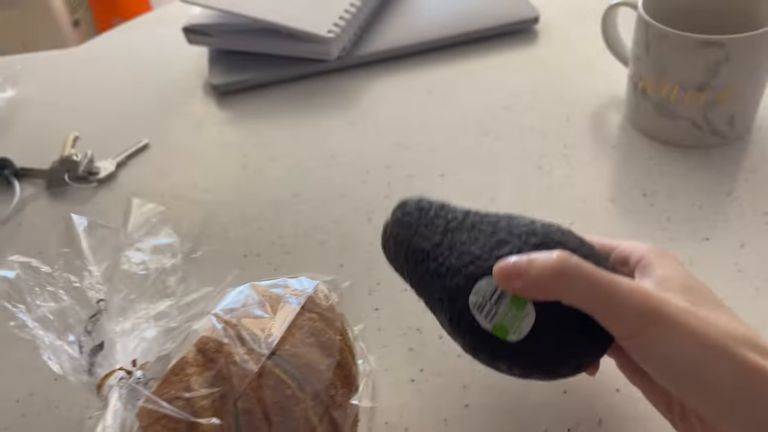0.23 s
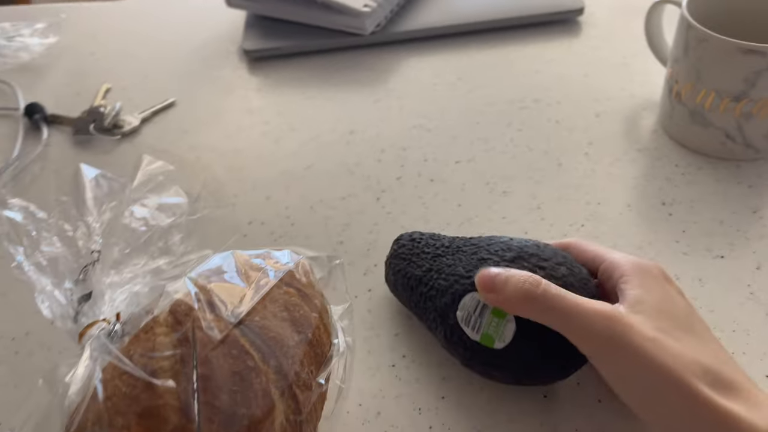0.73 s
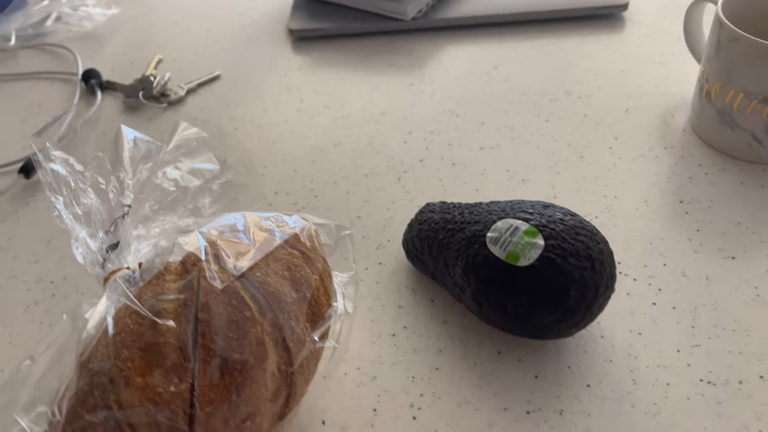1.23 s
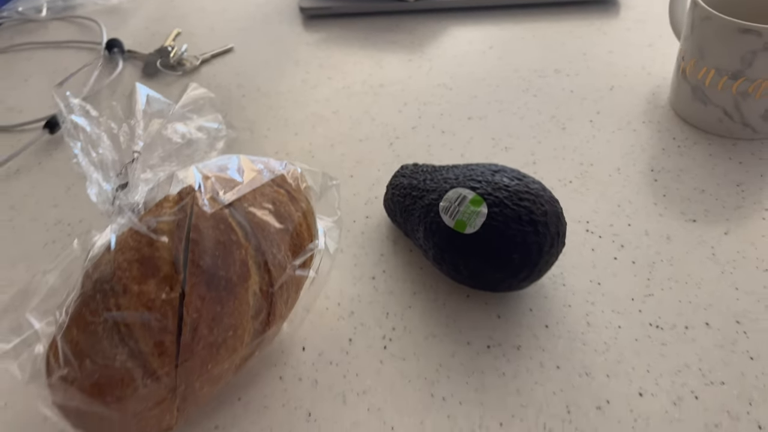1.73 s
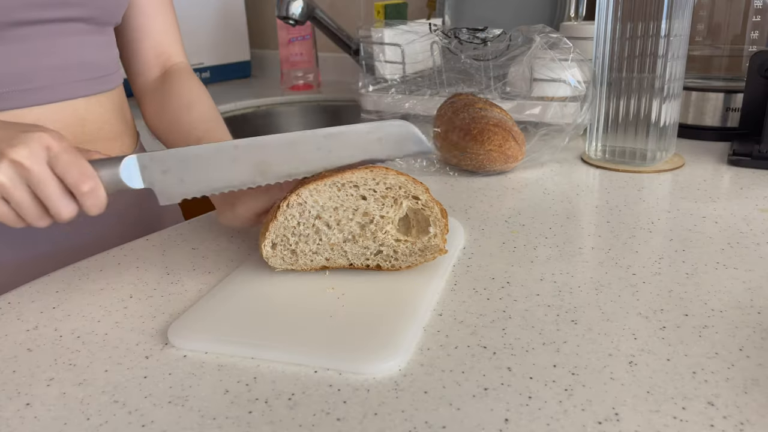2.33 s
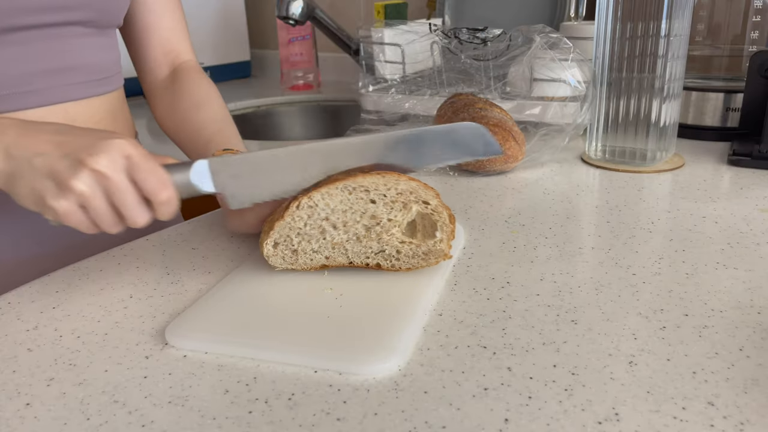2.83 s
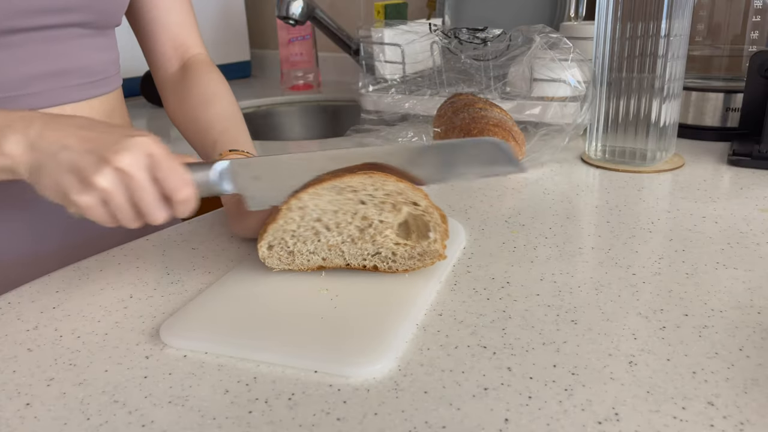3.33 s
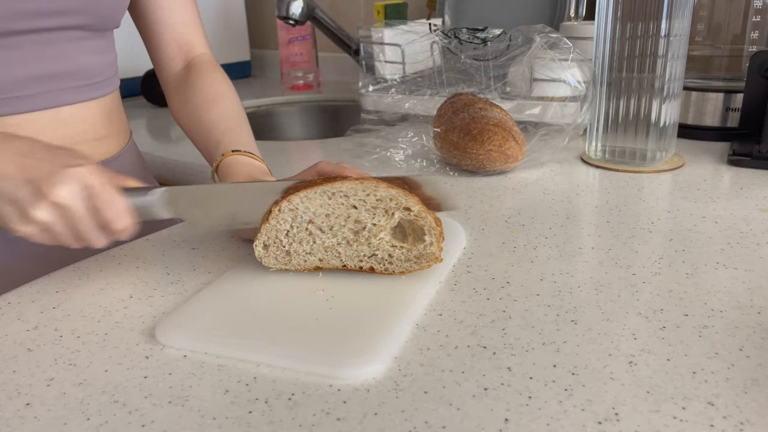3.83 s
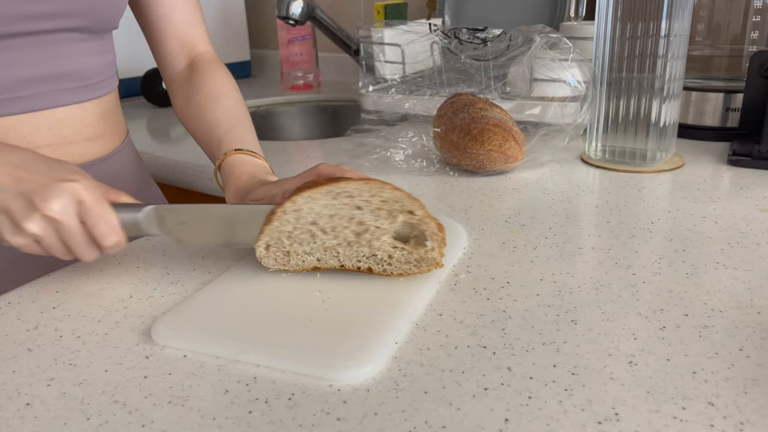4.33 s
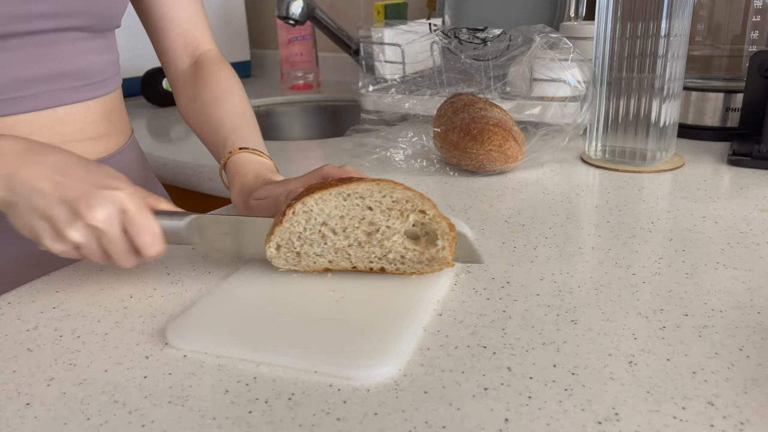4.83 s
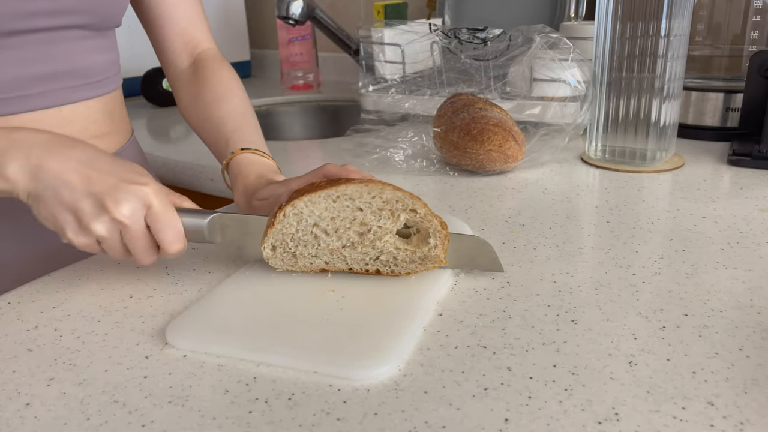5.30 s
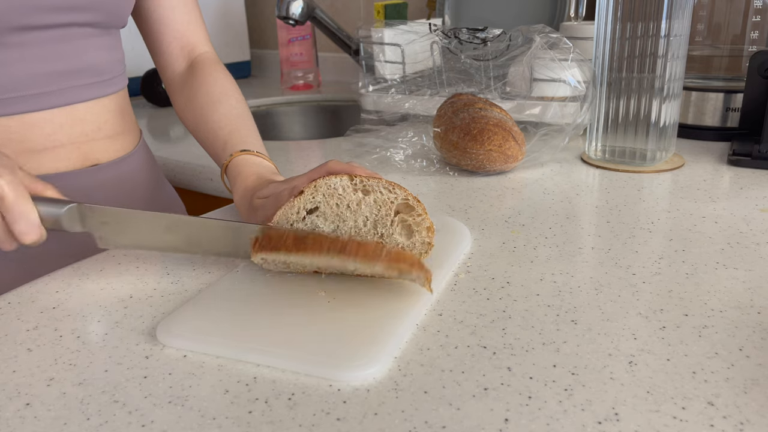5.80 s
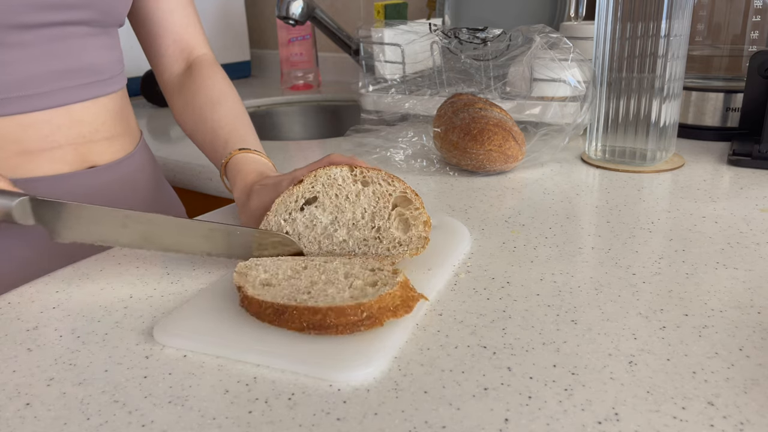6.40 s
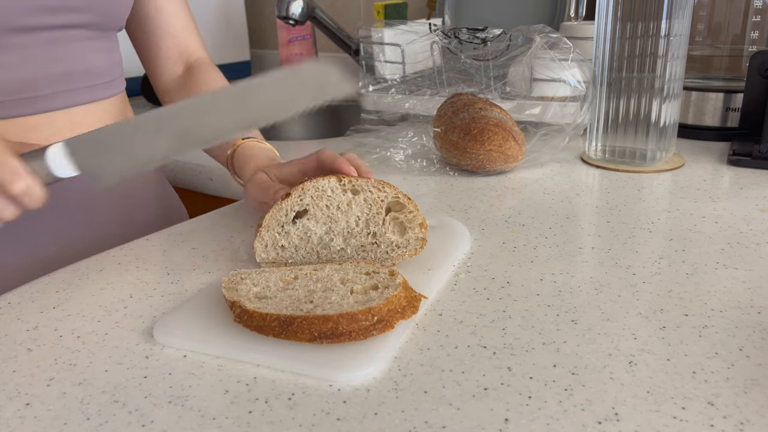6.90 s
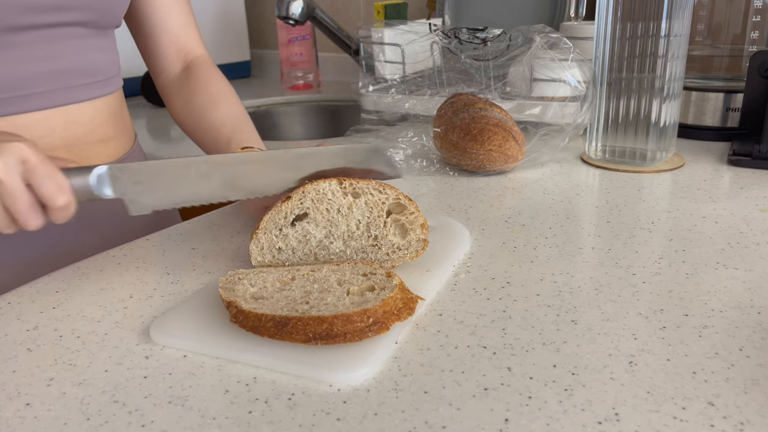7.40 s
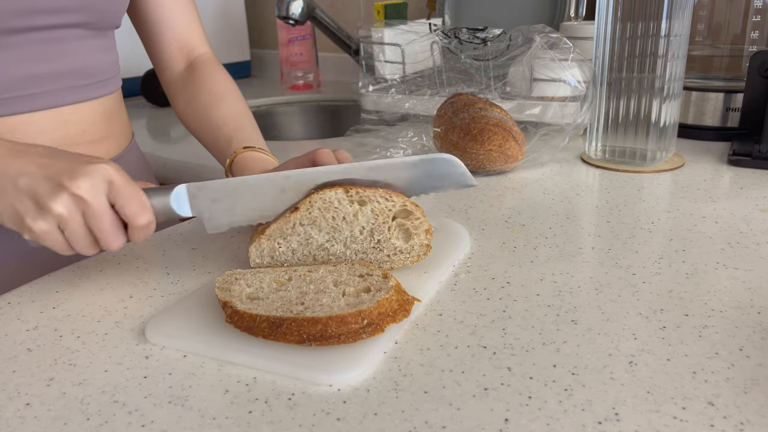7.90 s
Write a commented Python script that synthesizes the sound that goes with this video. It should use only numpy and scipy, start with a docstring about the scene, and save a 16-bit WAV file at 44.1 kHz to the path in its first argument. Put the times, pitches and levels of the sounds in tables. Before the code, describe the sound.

Sleeves rustle and an avocado lands softly on a counter, then a serrated knife saws crisply through a crusty loaf and starts another slice.

```python
"""A fruit is set on a kitchen counter and sleeves rustle: dull modal knocks, short ticks and the hiss of fibres.
After a short silence a serrated knife saws through a crusty loaf on a plastic board, scrapes the board and
starts a new slice: grains of tearing crumb, clumps of breaking loaf, board resonances and ringing steel modes.
Ventilation, as banded noise, and a low hum of uneven level lie beneath; two ports hear it all in stereo."""
import sys
import numpy as np
from scipy import signal
from scipy.fft import rfft, irfft, next_fast_len
from scipy.io import wavfile
from scipy.ndimage import uniform_filter1d

SR = 44100
rng = np.random.default_rng(int(sys.argv[2]) if len(sys.argv) > 2 else 0)


def put_to_file(sound):
    """Save the sound as 16-bit audio at rate SR, in the file named by the first command-line argument."""
    columns = np.atleast_2d(sound).T  # one column per channel
    safe = np.clip(columns, -1, 1)
    whole_steps = np.round(safe * 32767)
    wavfile.write(sys.argv[1], SR, whole_steps.astype(np.int16))


N = 359415
FFT_LENGTH = next_fast_len(N)
HZ = np.arange(FFT_LENGTH // 2 + 1) * SR / FFT_LENGTH  # frequency of every bin
TIME_S = np.arange(N) / SR
SILENCE_S = 2.2225, 2.2685  # start and end
BURST_SAMPLES = 600  # length of a tick's noise
BOARD_LOW_HZ = 93  # the small board radiates little below this


def knife():
    """Stick-slip friction: teeth tear the crumb in grains, and the same motion drives loaf, board and blade."""
    # saw strokes: start t/s, length/s, share of length before the fastest point (0-1), hiss gain/dB,
    # gains re hiss/dB of loaf body, loaf rasp and board
    strokes = [(2.289, 0.25, 0.6, -70.5, 9, 10.5, 15), (2.558, 0.2, 0.39, -66.5, -12, 0, -2),
               (2.702, 0.24, 0.49, -57.5, 4.5, 9.5, 9.5), (2.935, 0.24, 0.25, -62.5, 2, 4, 7),
               (3.103, 0.25, 0.35, -54, 7.5, 5.5, 7.5), (3.311, 0.23, 0.37, -55.5, 3, 6, 7),
               (3.492, 0.25, 0.37, -52.5, 5, 7.5, 4.5), (3.708, 0.22, 0.46, -54.5, 3.5, 10.5, 6.5),
               (3.918, 0.23, 0.3, -55.5, 6, 7.5, 8.5), (4.118, 0.21, 0.47, -58, 9, 5.5, 9),
               (4.315, 0.2, 0.42, -55.5, 4.5, 4.5, 6), (4.46, 0.26, 0.61, -58.5, 5, 5.5, 6),
               (4.691, 0.21, 0.55, -57, 1.5, 4, 5.5), (4.829, 0.34, 0.59, -62, 0, 1.5, 6.5),
               (5.12, 0.19, 0.52, -62.5, 14.5, 7.5, 18), (5.282, 0.49, 0.42, -67.5, 9.5, 6, 19.5),
               (5.503, 0.33, 0.62, -73, 11.5, 7.5, 17), (5.942, 0.18, 0.22, -78.5, -2.5, 6, -3),
               (7.213, 0.18, 0.31, -70.5, 3, -4, -1), (7.367, 0.25, 0.3, -66, 10.5, 5.5, 8),
               (7.52, 0.2, 0.64, -78.5, -2, 6, 18.5), (7.728, 0.22, 0.42, -58.5, 9, 8, 6.5),
               (7.918, 0.21, 0.37, -60, -2, 3, 4.5), (8.077, 0.2, 0.48, -56, 4, 7, 11)]
    # blade brushing or dragging over board and crust: start t/s, contact/s, hiss gain/dB,
    # gains re hiss/dB of loaf body, loaf rasp and board
    scrapes = [(6.108, 0.018, -71.5, 9.9, 9.4, 1), (6.414, 0.027, -58.5, 3.8, 9.3, 5.5),
               (7.058, .012, -78.5, 6, 2, 8)]
    # colour of tearing crumb: f/Hz, relative level/dB
    crumb_colour = [(1800, -14), (2800, -3), (4500, -4), (6300, -6), (7500, -1.5), (9000, 0.5),
                    (10500, -0.5), (11500, 3.5), (12100, -39), (12800, -24)]
    # board resonances: f/Hz, width/Hz (t60 is 2.9 / width), drive gain/dB
    board_modes = [(137, 58, 1.5), (156, 69, 3.5), (210.5, 48, -2.5), (273, 27, -3), (358, 63, -2)]
    moves = strokes + scrapes
    shapes = [sweep(*row[:3]) for row in strokes] + [scrape(*row[:2]) for row in scrapes]
    gains = movement_gains(shapes, [row[-4] for row in moves], [row[-3:] for row in moves])
    hiss_gain, body_gain, rasp_gain, board_gain = gains

    catch = undb(1.27 * walk(90))  # the teeth catch and let go unevenly
    tearing = grains(12000, spread_db=1.13)
    crumb = undb(2.5) * unit(shape(tearing, undb(on_hz(crumb_colour))))

    shove = grains(900, spread_db=0.73)
    board = unit(sum(undb(db) * ring(shove, hz, 2.9 / width) for hz, width, db in board_modes))
    cushion = 1 / (1 + (HZ / 460) ** 6)  # the soft loaf cushions the push
    radiation = 1 / (1 + (BOARD_LOW_HZ / (HZ + 1)) ** 4)
    board = unit(shape(board, cushion * radiation))

    impulse = 1. * (np.arange(4000) == 0)
    held_response = blade(impulse, 0.13)  # bread leaves this share of the ring time
    held = unit(signal.oaconvolve(grains(5000, spread_db=1.3), held_response)[:N])
    hiss = crumb + undb(-8) * held
    return catch * (hiss_gain * hiss + crunch(body_gain, rasp_gain) + board_gain * board)


def crunch(body_gain, rasp_gain):
    """Brittle fracture: the loaf breaks in clumps that come and go separately in body, middle and upper rasp."""
    # colour of breaking loaf: f/Hz, relative level/dB
    loaf_colour = [(250, -22.5), (400, 1.5), (620, 6.5), (900, -4), (1340, -1.5), (1600, -3.5), (1800, -5),
                   (2300, -7.5), (2860, -11), (3600, -24.5)]
    # extra gain of the upper rasp, which grows as the blade sinks into the crumb: t/s, gain/dB
    rasp_course = [(2.7, -8.5), (3.5, -1), (4.7, 7.5), (5.3, 6), (7.3, -7.5)]
    body_top_hz, rasp_hz = 836, 2050  # body below, upper rasp above
    loaf = unit(shape(grains(4000, spread_db=2.0), undb(on_hz(loaf_colour))))
    body = shape(loaf, 1 / (1 + (HZ / body_top_hz) ** 6))
    upper = shape(loaf, 1 - 1 / (1 + (HZ / rasp_hz) ** 6))
    middle = loaf - body - upper
    upper_gain = rasp_gain * undb(over_time(rasp_course))
    parts = body * body_gain, middle * rasp_gain, upper * upper_gain
    return sum(part * undb(2.0 * walk(30)) for part in parts)


def blade(force, share):
    """Modal superposition: steel rings in bending modes; contact leaves only a share of each ring time."""
    # bending modes of the blade: f/Hz, drive gain/dB, undamped t60/s
    modes = [(620, -7, .14), (1165, -1.5, .18), (1925, -7, .1), (2270, -2, .08), (3046, -19, .4),
             (3235, -5, .36), (3924, -14, .44), (4059, -6, .25), (4931, -3, .22), (5864, -15, .22),
             (6010, -10, .12), (6990, -9, .14), (7499, -11, .12), (8513, -13, .23), (8802, 1, .27),
             (9385, -10, .16), (10430, -4, .09), (11069, -11, .5), (11770, -5, .13), (12284, -13, .42)]
    return sum(undb(db) * ring(force, hz, share * t60) for hz, db, t60 in modes)


def blade_ticks():
    """Impulsive excitation: each click is a brief noise near its centre and jolts the nearby blade modes most."""
    # crust cracking around the blade: t/s, click peak/dB, centre f/Hz
    cracks = [(2.39, -59, 3000), (2.454, -50, 4500), (2.795, -42, 2500), (3.133, -60, 2900),
              (3.141, -59, 3000), (3.522, -39, 7040), (3.752, -43.5, 6000), (3.777, -51, 6000),
              (3.836, -32, 1700), (3.936, -55, 7000), (4.026, -34.5, 1720), (4.352, -39, 7000),
              (5.049, -38, 2600), (5.21, -44, 1800), (5.588, -45, 7000), (7.131, -60, 1470),
              (7.404, -47, 1170), (7.479, -44, 9000), (8.134, -53, 3000)]
    # taps and jolts of the blade, some damped, some ringing freely: t/s, click peak/dB, centre f/Hz,
    # blade drive re click peak/dB, share of ring time (0-1)
    taps = [(6.115, -47, 9850, -14, .1), (6.133, -51, 10500, -13, .2), (6.562, -62, 9000, -14, .4),
            (6.97, -65, 6000, -17, .16), (7.07, -60, 8500, -14, .25), (7.265, -51, 8500, -18, .2),
            (6.423, -46, 9500, -10, .98), (6.428, -39, 1500, 1, .8), (6.434, -46, 5400, -6, .9),
            (6.44, -48, 8800, -1, 1), (6.445, -47, 11400, -5, .9), (6.457, -43, 3500, 1, 1),
            (7.277, -63, 4700, 4, .5)]
    tail = 30000  # longest ring, samples
    out, t = np.zeros(N + tail), np.arange(tail) / SR
    rows = [(*row, -27, 0.39) for row in cracks] + list(taps)  # cracks: blade drive dB, share
    noises = rng.standard_normal((len(rows), BURST_SAMPLES))
    for (start, db, hz, ring_db, share), noise in zip(rows, noises):
        burst = noise * np.exp(-t[:BURST_SAMPLES] / 0.0015)
        click = 0.11 * burst + 0.76 * ring(burst, hz, 3.3 / hz)
        # two resonators in series gather the jolt around the click's centre
        jolt = ring(ring(1. * (t == 0), hz, 2.6 / hz), hz, 2.6 / hz)
        jolt = jolt[:int(tail * min(share, 1))] * (hz / 11000) ** 2
        i = int(start * SR)
        out[i:i + BURST_SAMPLES] += undb(db) * click / np.abs(click).max()
        out[i:i + len(jolt)] += undb(db + ring_db) * blade(jolt, share)
    return out[:N]


def knocks():
    """Modal impact: a soft blow excites a low mode and a weaker, longer one at 1.6 times its frequency."""
    # dull knocks through counter and board: t/s, drive gain/dB, lower mode f/Hz, its t60/s
    blows = [(.475, -24.5, 293, 0.038), (5.046, -34.5, 137, 0.23), (5.056, -33, 313, 0.035),
             (5.201, -31.5, 171, 0.12), (5.22, -24, 132.6, 0.12), (5.26, -26.5, 137.3, 0.082),
             (5.41, -38, 144, 0.18), (5.459, -32.5, 273, 0.1), (3.268, -44, 620, .05),
             (5.52, -41, 298, 0.077), (6.421, -40, 334, 0.28), (7.479, -45, 131, 0.12)]
    out, force = np.zeros(N), np.zeros(12000)
    force[:120] = np.hanning(120) / 50
    for start, db, hz, t60 in blows:
        i = int(start * SR)
        low, high = ring(force, hz, t60), ring(force, 1.6 * hz, 2.1 * t60)
        out[i:i + 12000] += undb(db) * (0.62 * low + 0.25 * high)
    return signal.sosfilt(signal.butter(2, BOARD_LOW_HZ, "high", fs=SR, output="sos"), out)


def counter_ticks():
    """Damped resonance: a very short contact rings one narrow band for a few cycles."""
    # small ticks at the counter: t/s, peak level/dB, centre f/Hz
    contacts = [(.310, -38, 8000), (.476, -47, 3600), (.589, -60, 4300), (.975, -55, 9500),
                (2.133, -32, 960), (2.133, -58, 5500), (1.8152, -30, 1680), (1.8152, -29, 2850),
                (1.8152, -33, 3700), (1.8152, -37, 7000), (1.8152, -36, 9500)]
    out, t = np.zeros(N), np.arange(BURST_SAMPLES) / SR
    noises = rng.standard_normal((len(contacts), BURST_SAMPLES))
    for (start, db, hz), noise in zip(contacts, noises):
        contact = noise * np.exp(-t / 0.0005)
        tick = ring(ring(contact, hz, 6.5 / hz), hz, 3.0 / hz)
        out[int(start * SR):][:BURST_SAMPLES] += undb(db) * tick / np.abs(tick).max()
    return out


def rustle():
    """Sliding friction: slipping fibres make many tiny breaks, heard as fine hiss with a duller rub beneath."""
    # sleeves and fingers sliding: start t/s, length/s, share of length before the fastest point (0-1),
    # hiss gain/dB, dull gain re hiss/dB
    slides = [(-.03, 0.22, 0.26, -39.5, -14), (0.059, 0.24, 0.5, -43, -23), (0.228, 0.31, 0.21, -59, -9),
              (.88, .4, 0.4, -75, -14), (0.979, 0.43, 0.48, -53.5, -18), (1.342, 0.21, 0.54, -68.5, -6),
              (1.565, 0.38, 0.53, -63.5, -3.5), (1.779, 0.25, 0.27, -73, 14.5)]
    # colour of cloth: f/Hz, relative level/dB
    cloth_colour = [(2500, -13), (4000, -8.5), (6000, -6), (7500, -4.5), (9000, 1.5), (10500, -1),
                    (11500, 1), (12100, -23), (12800, -6)]
    shapes = [sweep(*row[:3]) for row in slides]
    hiss_gain, dull_gain = movement_gains(shapes, [row[3] for row in slides], [row[4:] for row in slides])
    fibres = grains(15000, spread_db=0.8) * undb(walk(40))
    hiss = undb(6.0) * unit(shape(fibres, undb(on_hz(cloth_colour))))
    rub_colour = [(700, -17.5), (1400, 3.5), (3500, -1.0), (5000, -21)]  # f/Hz, relative level/dB
    rub = unit(shape(fibres, undb(on_hz(rub_colour))))
    before = TIME_S < SILENCE_S[0]
    return before * (hiss_gain * hiss + dull_gain * rub)


def drone():
    """Modulated tone: a low hum, one sine whose pitch wavers and whose level rises and falls strongly."""
    # uneven level of the low hum: t/s, mean rms level/dB
    hum_level = [(0.0, -49), (0.45, -47), (0.5, -37), (0.91, -56), (1.18, -45), (1.23, -62), (1.38, -43),
                 (1.52, -70), (1.59, -46), (1.7, -78), (1.77, -50), (2.59, -56.5), (3.81, -53.5),
                 (3.86, -44.5), (4.06, -64), (4.29, -46), (4.61, -60), (5.15, -61), (5.29, -66),
                 (5.49, -57), (6.06, -61.5), (6.11, -70), (6.2, -50), (6.42, -61), (6.51, -45),
                 (6.56, -58.5), (7.69, -51.5), (7.81, -69), (8.01, -47.5), (8.15, -53)]
    hz = 61.35 + 4.92 * walk(7)
    level_db = over_time(hum_level) + 2.5 * walk(9)
    return np.sqrt(2) * undb(level_db) * np.sin(2 * np.pi * np.cumsum(hz) / SR)


def air():
    """Broadband flow noise: ventilation as overlapping bands, an octave apart, whose levels waver a little."""
    # ventilation heard at the counter: f/Hz, mean level in 1 Hz/dB
    near_spectrum = [(28, -94), (45, -66.5), (90, -66), (130, -68), (200, -72), (300, -77), (450, -82),
                     (620, -83.5), (800, -88.5), (1400, -89), (2000, -93.5), (2600, -100), (3500, -110),
                     (4800, -119), (8000, -120), (10500, -114), (11800, -116), (12900, -135)]
    # ventilation heard further off, at the board: f/Hz, mean level in 1 Hz/dB
    far_spectrum = [(28, -105), (45, -71.5), (90, -77.5), (130, -78.5), (200, -84.5), (300, -87.5),
                    (450, -88.5), (640, -92), (780, -102), (1200, -99), (1800, -101), (2500, -108),
                    (3400, -118), (4500, -127), (8000, -128), (10500, -122), (11800, -124), (12900, -142)]
    out, before = 0, np.arange(N) < SILENCE_S[0] * SR
    for spectrum, here in (near_spectrum, before), (far_spectrum, ~before):
        density = undb(on_hz(spectrum)) * np.sqrt(SR / 2)
        for centre in 30 * 2. ** np.arange(9):
            upper_edge = 1 if centre < 7000 else 0  # the top band stays open above its centre
            octaves_off = np.clip(np.log2((HZ + 1) / centre), -1, upper_edge)
            weight = np.abs(np.cos(octaves_off * np.pi / 2))  # neighbours sum to constant power
            band = shape(rng.standard_normal(N), weight * density)
            out = out + here * band * undb(1.2 * walk(2.966))
    return out


def sweep(start, length, early):
    """Kinematics of a stroke: loudness, 0-1, follows a power of speed, eased near full speed."""
    speed_power, easing = 3.81, .5
    done = np.clip((TIME_S - start) / length, 0, 1)
    warp = np.log(.5) / np.log(np.clip(early, .1, .9))  # puts the fastest point at `early`
    loud = np.abs(np.sin(np.pi * done ** warp)) ** speed_power
    return loud * (1 + easing) / (1 + easing * loud)


def scrape(start, contact):
    """Contact envelope: quick attack, a hold, then exponential decay; loudness 0-1."""
    attack_s, t60_s = 0.0064, .26
    t = TIME_S - start
    fade_db = -60 * np.clip(t - attack_s - contact, 0, None) / t60_s
    return np.clip(t / attack_s, 0, 1) ** 2 * undb(fade_db)


def linger(gain):
    """Reverberant energy decay: the kitchen carries each movement on as a fading tail."""
    tail_db, t60_s = -12.5, 0.7
    r = np.exp(-2 * np.log(1000) / (t60_s * SR))  # decay of power per sample
    tail_power = signal.lfilter([1 - r], [1, -r], gain ** 2)
    return np.sqrt(gain ** 2 + undb(tail_db) ** 2 * tail_power)


def movement_gains(shapes, hiss_db, parts_re_hiss_db):
    """Superposition: sums the movements into one gain for the hiss and one for each part moving with it."""
    hiss_db = np.array(hiss_db)[:, None]
    all_db = np.hstack([hiss_db, hiss_db + np.array(parts_re_hiss_db)])
    return [linger(gain) for gain in undb(all_db).T @ np.array(shapes)]


def grains(rate, spread_db):
    """Shot noise: dense tiny breaks of random sign, rate per second, a few much larger than the rest."""
    hit = rng.random(N) < rate / SR
    return unit(hit * rng.standard_normal(N) * undb(spread_db * rng.exponential(1, N)))


def walk(rate):
    """Slow random modulation: levels held 1 / rate s and slewed; rms 1."""
    hold = int(SR / rate)
    levels = rng.standard_normal(N // 100)
    return unit(uniform_filter1d(levels[np.arange(N) // hold], hold))


def ring(x, hz, t60):
    """Damped oscillator: one decaying mode; a unit blow starts it at amplitude 1."""
    r, w = np.exp(-np.log(1000) / (t60 * SR)), 2 * np.pi * hz / SR
    return signal.lfilter([np.sin(w)], [1, -2 * r * np.cos(w), r * r], x)


def shape(x, gain):
    """Linear filtering: weights every frequency bin."""
    return irfft(rfft(x, FFT_LENGTH) * gain, FFT_LENGTH)[..., :N]


def on_hz(table):
    """Logarithmic frequency scale: reads (f/Hz, value) at every bin, straight between points."""
    hz, value = np.transpose(table)
    return np.interp(np.log(HZ + 1), np.log(hz), value)


def over_time(table):
    """Linear interpolation: reads (t/s, value) at every sample."""
    t, value = np.transpose(table)
    return np.interp(TIME_S, t, value)


def undb(db):
    """Logarithmic level: decibels to amplitude gain."""
    return 10 ** (np.asarray(db) / 20)


def unit(x):
    """Mean power: scales to rms 1."""
    return x / np.sqrt(np.mean(x ** 2))


def scene():
    """Mid-side stereo: the ports differ by unrelated noise and, for blows, by their first echoes."""
    # side spectrum: f/Hz, side gain/dB
    side_colour = [(60, -20), (130, -15.5), (270, -11.5), (600, -2), (1300, -4.5), (2700, -7), (6000, -5),
                   (8000, -6.5), (8700, -16), (9400, -3.5), (10200, -33.5), (11000, -10), (13000, -18.5)]
    # balance of the ports: f/Hz, left minus right gain/dB
    balance = [(60, 0), (150, -0.8), (300, 0), (600, 0), (2000, 2), (5000, 4), (7500, 2.5), (8700, 0)]
    blows = counter_ticks() + blade_ticks() + knocks()
    early = np.arange(900)  # samples of first echoes
    echoes = rng.standard_normal(len(early)) * np.exp(-early / (0.007 * SR))
    echoes = unit(echoes) / np.sqrt(len(early))  # total energy 1
    mid = rustle() + knife() + air() + drone() + blows
    side = rustle() + knife() + air() + signal.oaconvolve(blows, echoes)[:N]
    side = shape(side, undb(on_hz(side_colour)))
    lean = undb(on_hz(balance) / 2)
    return shape(np.array([mid + side, mid - side]), np.array([lean, 1 / lean]))


def record(dry):
    """Phase difference: the ports turn against each other; the sound drops out once; the top is cut."""
    # phase by which the left port leads: f/Hz, phase/rad
    phase_lead = [(300, 0), (2500, 0.95), (4500, 0.66), (7700, 0.28), (8600, 0), (10200, -3.5),
                  (11800, -5.5), (12500, -6)]
    turn = np.exp(.5j * on_hz(phase_lead))
    wet = shape(dry, np.array([turn, 1 / turn]))
    fade_out = (SILENCE_S[0] - TIME_S) * 4000
    fade_in = (TIME_S - SILENCE_S[1]) * 300
    wet = wet * np.clip(np.maximum(fade_out, fade_in), 0, 1)
    top_cut = signal.ellip(10, .2, 70, 12700, fs=SR, output="sos")  # edge in Hz
    return signal.sosfilt(top_cut, wet)


dry = scene()
out = record(dry)
put_to_file(out)
```